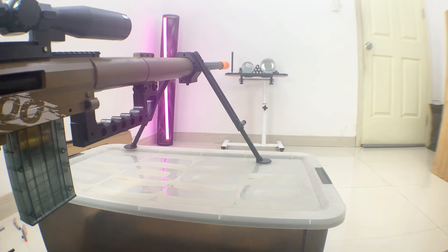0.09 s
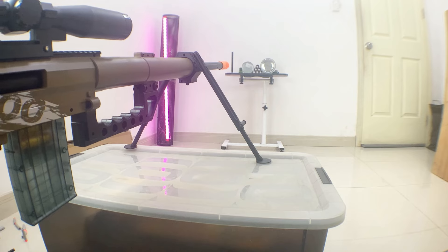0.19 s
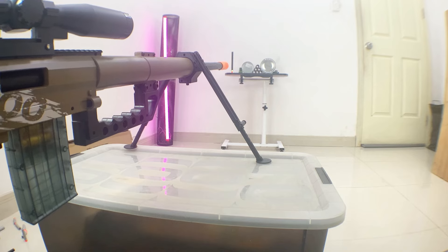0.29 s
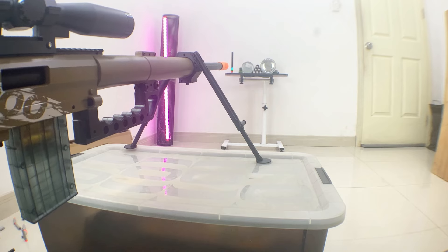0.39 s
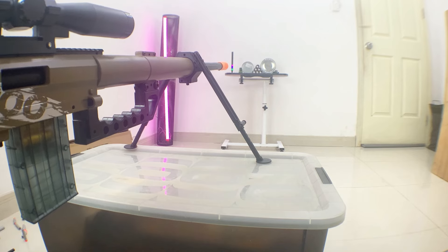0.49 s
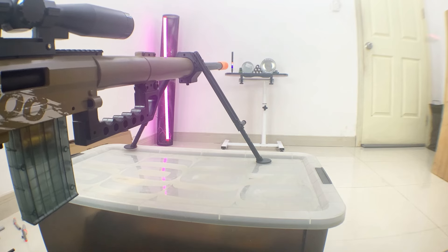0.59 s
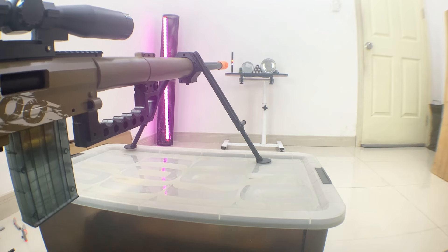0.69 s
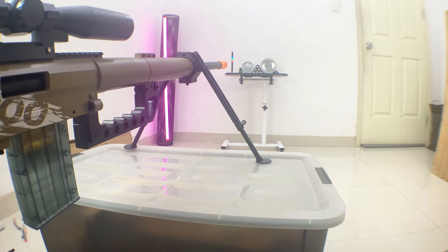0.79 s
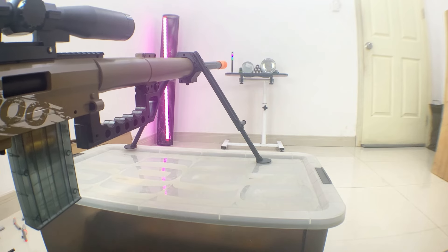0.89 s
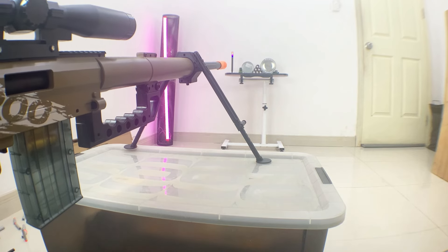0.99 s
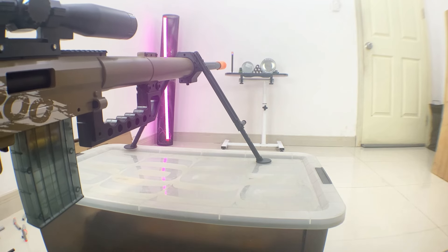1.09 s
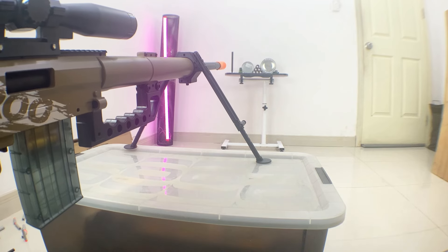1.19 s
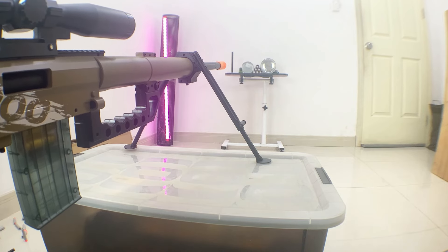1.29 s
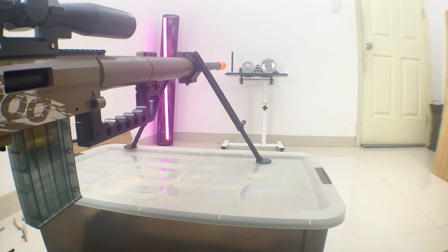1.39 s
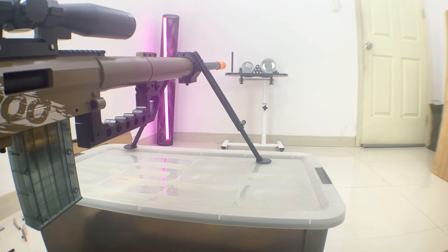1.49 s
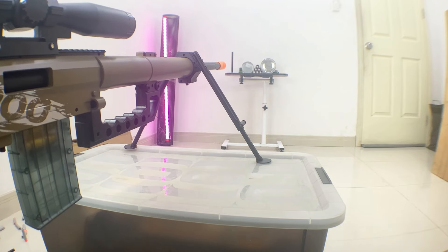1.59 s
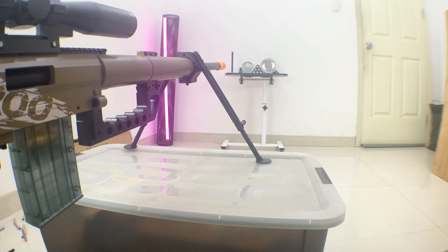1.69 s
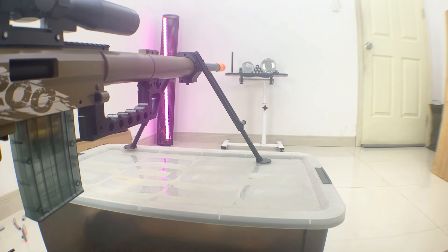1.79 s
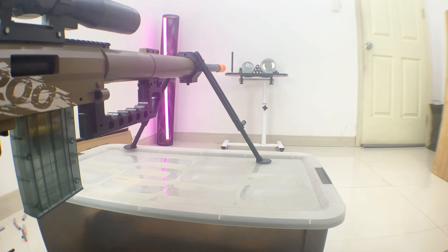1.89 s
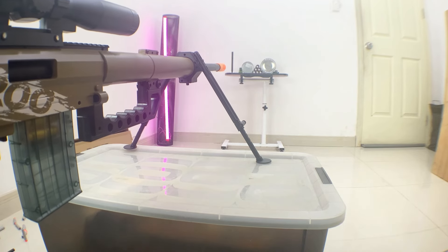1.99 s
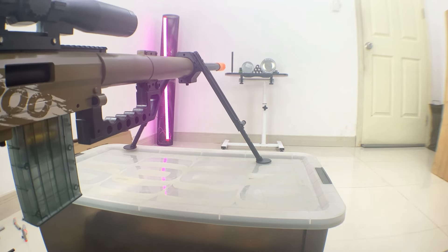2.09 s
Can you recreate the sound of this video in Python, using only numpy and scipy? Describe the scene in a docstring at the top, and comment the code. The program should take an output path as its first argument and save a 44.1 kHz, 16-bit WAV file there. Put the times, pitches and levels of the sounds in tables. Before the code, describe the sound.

One toy rifle shot in a small bare room: plunger slam, louder metal target bang and wavering ring, a small dart click, then quiet ticks and a brief high squeak over low hiss, overloaded close microphone.

```python
"""A spring-driven toy dart rifle fires in a small hard room: trigger tick, plunger release and slam. The dart
bangs into a thin metal target that rings, then it drops, a joint squeaks and small ticks follow.
Blows are short cracks of coloured noise plus the room's answer; metal is a set of wavering tones; the squeak
is a gliding tone with overtones and rasp. The loud part overloads the microphone; rumble and hiss lie below."""
import sys
import numpy as np
from scipy import signal
from scipy.fft import rfft, irfft, next_fast_len
from scipy.io import wavfile
from scipy.ndimage import map_coordinates

SR = 44100
rng = np.random.default_rng(int(sys.argv[2]) if len(sys.argv) > 2 else 0)


def gain_from_decibels(decibels):
    """Convert decibel values to linear amplitude factors."""
    exponent = np.asarray(decibels, float) / 20
    return 10 ** exponent


def to_wav(s):
    """Save 16-bit WAV."""
    ch = np.atleast_2d(s).T  # columns
    pcm = np.round(np.clip(ch, -1, 1) * 32767)  # PCM
    wavfile.write(sys.argv[1], SR, pcm.astype(np.int16))


N = 94815  # length in samples
T = np.arange(N) / SR  # time of each sample in seconds

# How fast the room dies away after near sounds. Each row: frequency in Hz, time to fall by 60 dB in s.
NEAR_ROOM = [(100, 0.38), (500, 0.33), (3000, 0.34), (6000, 0.48), (11000, 0.34), (16000, .15)]
HIT_S, METAL_RISE_S = .312, 0.03  # when the target starts to ring and how slowly its ring rises


def unit(x):
    """Scale to rms 1."""
    return x / np.sqrt(np.mean(x ** 2) + 1e-20)


def along(points, hz):
    """Read a curve of (Hz, value) points on a log frequency axis."""
    f, v = np.transpose(points)
    return np.interp(np.log(hz + 1), np.log(f + 1), v)


def curves(rows):
    """One value per sample for each column after the time."""
    s, *cols = np.transpose(rows)
    return [np.interp(T, s, c) for c in cols]


def wobble(rate):
    """A smooth random curve with rate random points a second, at most 1500."""
    return map_coordinates(rng.standard_normal(4000), [T * min(rate, 1500)])


def noise(response):
    """Noise of rms 1 with a gain that depends on frequency."""
    m = next_fast_len(N)
    spectrum = rfft(rng.standard_normal(m)) * response(np.fft.rfftfreq(m, 1 / SR))
    return unit(irfft(spectrum, m)[:N])


def band(hz, width_hz):
    """Gain of one resonance, strongest at its own pitch."""
    return lambda f: np.abs(f * width_hz / (hz * hz - f * f + 1j * f * width_hz))


def dying(s, t60, rise_s):
    """Envelope that starts at s, rises and then falls by 60 dB in t60 seconds."""
    t = np.clip(T - s, 0, None)
    return (1 - np.exp(-t / rise_s)) * gain_from_decibels(-60 * t / t60)


def tail(x, s, room):
    """Turn steady noise into the room's answer to a blow at s: each frequency dies at its own speed."""
    late_db, late_longer = -26.5, 2.6  # a weaker, slower second slope
    build_s = 0.0014  # rise of the room's answer
    hz, t, z = signal.stft(x, SR, nperseg=256)
    fall_db = -60 * np.clip(t - s, 0, None) / along(room, hz)[:, None]
    z = z * (gain_from_decibels(fall_db) + gain_from_decibels(late_db + fall_db / late_longer))
    answer = signal.istft(z, SR, nperseg=256)[1][:N]
    return answer * dying(s, 1e3, build_s)


def blows(rows, colour, room):
    """Each blow is a short crack and the room's answer, in the colour of the struck thing."""
    gain = lambda f: gain_from_decibels(along(colour, f))
    total = 0
    for s, crack_db, t60, room_db in rows:
        crack = gain_from_decibels(crack_db) * noise(gain) * dying(s, t60, 1e-4)
        answer = gain_from_decibels(room_db) * tail(noise(gain), s, room)
        total = total + crack + answer
    return total


def floor():
    """Background rumble and hiss with a few narrow noise bands, all gently wavering in level."""
    # Colour of the hiss. Each row: frequency in Hz, relative level in dB per Hz.
    hiss_colour = [(4.7, -30.5), (8.0, 2.5), (97, -8.5), (156, -14), (229, -26.5), (325, -18.5),
                   (433, -23.5), (635, -22), (903, -27), (1500, -30.5), (2350, -30.5), (3340, -27.5),
                   (5400, -36), (15000, -50.5), (16500, -62)]
    # Slow course of the hiss. Each row: time in seconds, level in dB about which it wavers.
    hiss_level = [(0, -54.5), (.2, -52), (.46, -60.5), (.7, -51), (.9, -51.5), (1.3, -49), (2.15, -49.5)]
    # Narrow hiss bands. Each row: frequency in Hz, resonance width in Hz, level in dB about which it wavers.
    whines = [(324, 160, -66), (585, 35, -71), (1520, 130, -68), (3320, 160, -65.5), (6820, 390, -77.5),
              (9250, 200, -82), (10710, 160, -77)]
    level_db, = curves(hiss_level)
    total = noise(lambda f: gain_from_decibels(along(hiss_colour, f))) * gain_from_decibels(level_db + .7 * wobble(8))
    for hz, width_hz, db in whines:
        whine = noise(lambda f: band(hz, width_hz)(f) ** 2)
        total = total + gain_from_decibels(db + 1.4 * wobble(13)) * whine
    return total


def ticks():
    """Faint ticks and rustles of settling parts: short bursts of noise around one pitch."""
    # Each row: start in seconds, level in dB, pitch in Hz, time to fall by 60 dB in s.
    tick_rows = [(1.2095, -40.5, 1570, 0.018), (1.19, -48.5, 397, 0.092), (1.211, -47.5, 150, 0.057),
                 (1.3357, -52, 1200, .04), (1.4395, -58.5, 8990, 0.029), (1.5194, -40.5, 3056, 0.013),
                 (1.523, -49, 2050, 0.035), (1.65, -54, 1548, .05), (1.7775, -50, 2000, 0.022),
                 (1.845, -52, 1400, 0.058), (1.862, -51, 4200, 0.032), (2.048, -49, 1540, 0.019),
                 (2.068, -48.5, 4000, 0.047), (2.094, -53, 820, 0.095), (2.116, -42, 1105, 0.037),
                 (2.129, -49, 880, 0.1)]
    total = 0
    for s, db, hz, t60 in tick_rows:
        grain = noise(lambda f: band(hz, .9 * hz)(f) ** 2)
        total = total + gain_from_decibels(db) * grain * dying(s, t60, 0.00048)
    return total


def squeal(rows):
    """A stick-slip squeal: a gliding tone with overtones and rasp; roughness shakes pitch and level."""
    # Each row: multiple of the pitch, level in dB on top of the overtone curve.
    overtones = [(2, 1.5), (3, -5.5), (4, -14)]
    # Colour of the rasp. Each row: frequency in Hz, relative level in dB per Hz.
    rasp_colour = [(1800, -34), (2500, 2), (3400, 12), (4500, 2), (6200, -5), (8000, -18), (12000, -25),
                   (14000, -40)]
    jitter_hz, flutter_db, rasp_db = 91, 4, -7  # each at roughness 1
    hz, db, over_db, rough = curves(rows)
    phase = 2 * np.pi * np.cumsum(hz + rough * jitter_hz * wobble(400)) / SR
    tone = np.sin(phase)
    for k, extra_db in overtones:
        tone = tone + gain_from_decibels(over_db + extra_db) * np.sin(k * phase)
    rasp = rough * gain_from_decibels(rasp_db) * noise(lambda f: gain_from_decibels(along(rasp_colour, f)))
    level = gain_from_decibels(db + rough * flutter_db * wobble(250))
    sounding = (T > rows[0][0]) * (T < rows[-1][0])
    return (np.sqrt(2) * tone + rasp) * level * sounding


def squeak():
    """Two squealing contacts of a joint and their echo in the room."""
    # Each row: time in seconds, pitch in Hz, level in dB, overtones in dB, roughness (0 is smooth, 1 rough).
    low_squeal = [(1.945, 3062, -64.5, -28, 0.06), (1.958, 3076, -43.5, -32, .2),
                  (1.968, 3047, -54, -30, 0.3), (1.978, 2980, -33, -24, 0.3), (1.985, 3185, -46.5, -10, .4),
                  (1.99, 3063, -61, -14.5, 0.96), (2.003, 3012, -47, -15, 1), (2.02, 3100, -55, -11, 1.1),
                  (2.048, 2890, -50.5, -21, 1.04), (2.058, 2953, -66, -21, 1.04)]
    # Each row: time in seconds, pitch in Hz, level in dB, overtones in dB, roughness (0 is smooth, 1 rough).
    high_squeal = [(1.982, 3680, -64, -25, 0.77), (1.987, 3638, -46, -25, 0.86), (2.0, 3613, -49, -23, 1),
                   (2.018, 3590, -53.5, -20, 0.96), (2.027, 3372, -39.5, -19.5, 0.47),
                   (2.036, 3460, -50, -9, 0.5), (2.055, 3440, -54.5, -13, .6),
                   (2.068, 3453, -67, -18.5, 0.96)]
    room_db = -6.5
    direct = squeal(low_squeal) + squeal(high_squeal)
    echo = tail(rng.standard_normal(N), 0, NEAR_ROOM)[:SR // 2]
    echo = echo / np.linalg.norm(echo)
    return direct + gain_from_decibels(room_db) * signal.fftconvolve(direct, echo)[:N]


def drop():
    """The dart clicks on the floor, far off: a few very short tones plus coloured blows."""
    # Dart on the floor. Each row: start in seconds, crack in dB, crack's 60 dB fall in s, room in dB.
    falls = [(.9255, -16.5, 0.0092, -32.5), (.9445, -30, 0.022, -39)]
    # Colour of the blows. Each row: frequency in Hz, relative level in dB per Hz.
    colour = [(180, -55), (300, -30), (800, -16), (1400, -16.5), (1700, 3), (1910, -9.5), (2780, -2),
              (3300, -10), (3700, -19.5), (4690, -8.5), (5440, -18), (7500, -26.5), (9030, -22.5),
              (12000, -31.5), (13500, -50), (16000, -54.5)]
    # The dart's own tones. Each row: frequency in Hz, level in dB, time to fall by 60 dB in s.
    dart_tones = [(1730, -33, 0.017), (2660, -15.5, 0.015), (3100, -24, 0.028), (4830, -31.5, 0.016)]
    # How fast the room dies after this far sound. Each row: frequency in Hz, time to fall by 60 dB in s.
    far_room = [(300, 0.31), (1500, 0.39), (3000, 0.48), (6000, 0.33), (11000, 0.52), (16000, 0.26)]
    s = falls[0][0]
    click = 0
    for hz, db, t60 in dart_tones:
        click = click + gain_from_decibels(db) * dying(s, t60, 0.0005) * np.sin(2 * np.pi * hz * (T - s))
    return click + blows(falls, colour, far_room)


def pings():
    """Brief soft swells of single tones as the target settles."""
    # Each row: start in seconds, frequency in Hz, level in dB, time to fall by 60 dB in s.
    ping_rows = [(.495, 1335, -17, .12), (.605, 1690, -25, .12), (.6, 421, -27, .15),
                 (.706, 1338, -24, .09), (.95, 1700, -35, .14)]
    total = 0
    for s, hz, db, t60 in ping_rows:
        tone = np.sin(2 * np.pi * (hz * T + rng.random()))
        total = total + gain_from_decibels(db) * dying(s, t60, .015) * tone
    return total


def stand():
    """One long clear ring of the target's stand outlasts the bang, its level wavering slowly."""
    # The ring: frequency in Hz, level in dB about which it wavers, time to fall by 60 dB in s.
    linger = (851, -30, 1.62)
    hz, db, t60 = linger
    return gain_from_decibels(db + 1.2 * wobble(5)) * dying(HIT_S, t60, METAL_RISE_S) * np.sin(2 * np.pi * hz * T)


def target():
    """Sheet metal rings at many pitches, each wavering as the room smears it."""
    # Each row: frequency in Hz, relative level in dB, time to fall by 60 dB in s, slow waver in Hz.
    modes = [(307.9, -10, 0.56, 24), (327.3, 1.2, .55, 9), (349, -22.5, 0.86, 18), (389, -2, 0.41, 20.8),
             (423, 1.5, 0.61, 8.3), (588, -6, .5, 25.5), (674, -14.5, 0.27, 20), (775, -1.5, 0.43, 22),
             (985, -8.5, .55, 21.6), (1335, -8.5, 0.78, 25.58), (1550, -12, 0.52, 16),
             (1674.5, -2.5, 0.64, 12.34), (1725, -1.5, .7, 14.94), (2207, -8, 0.61, 23),
             (2740, -17.5, 0.92, 30), (3950, -16, .55, 90), (4143, -1.5, 0.43, 70), (4593, -13, 0.84, 350)]
    # The level of the ring moves up and down in steps. Each row: time in seconds, change in dB.
    ring_level = [(.31, 3), (.4, -2), (.46, 5.5), (.475, -2.5), (.515, 4), (.53, -2), (.6, -1), (.635, 6.5),
                  (.65, -12), (.7, 4), (.725, 5), (.745, 1), (.82, 5), (.9, 8.5)]
    ring_db = -3.5
    steady, slow, fast = .5, .5, .4  # shares of the plain tone and of its two wavers
    ring = 0
    for hz, db, t60, waver_hz in modes:
        fast_hz = 3 * waver_hz
        slow_waver = wobble(waver_hz) + 1j * wobble(waver_hz)
        fast_waver = wobble(fast_hz) + 1j * wobble(fast_hz)
        smear = steady + slow * slow_waver + fast * fast_waver
        tone = np.real(smear * np.exp(2j * np.pi * (hz * T + rng.random())))
        ring = ring + gain_from_decibels(db) * dying(HIT_S, t60, METAL_RISE_S) * tone
    return gain_from_decibels(ring_db + curves(ring_level)[0]) * ring


def bang():
    """The dart hits the target: one loud noisy crack that the room answers."""
    # Each row: start in seconds, crack in dB, crack's 60 dB fall in s, room in dB.
    hit = [(.312, 0.5, .02, 1)]
    # Colour of the hit. Each row: frequency in Hz, relative level in dB per Hz.
    colour = [(120, -79.5), (200, -37.5), (303, -4), (412, -2), (485, -12.5), (761, -6.5), (1170, -19),
              (1310, -3), (1720, -12), (2020, -12.5), (3600, -14.5), (4100, -8.5), (4700, -12),
              (5300, -17.5), (7280, -15.5), (11400, -20.5), (13200, -36.5), (16000, -46)]
    # How fast the room dies after the hit. Each row: frequency in Hz, time to fall by 60 dB in s.
    bang_room = [(100, 0.5), (300, 0.46), (1000, 0.54), (3000, 0.59), (6000, 0.51), (11000, 0.3),
                 (16000, .25)]
    return blows(hit, colour, bang_room)


def rifle():
    """Trigger tick, plunger release and slam: parts knock together and the room answers."""
    # Each row: start in seconds, crack in dB, crack's 60 dB fall in s, room in dB.
    contacts = [(.194, -57, 0.019, -59), (.2055, -42, .02, -41.5), (.2075, -9, 0.045, -12),
                (.215, 6, 0.026, -10)]
    # Colour of the rifle. Each row: frequency in Hz, relative level in dB per Hz.
    colour = [(59, -44.5), (100, -6.5), (249, -7), (308, -0.5), (365, -7), (558, 3.5), (784, -7), (991, -1),
              (1800, -12.5), (1950, -4.5), (2320, -12), (2690, -2.5), (3540, -2.5), (9820, -21),
              (16000, -37)]
    return blows(contacts, colour, NEAR_ROOM)


def scene():
    """All sources except the background, in one channel."""
    shot = rifle() + bang() + target() + stand() + pings()
    return (shot + drop() + ticks() + squeak())[None]


def band_limit(x):
    """A steep low-pass at the top of the band."""
    return signal.sosfilt(signal.butter(12, 16990, fs=SR, output="sos"), x)


def record(dry):
    """The microphone overloads, the level moves, lows and top are cut and background noise is added."""
    # Overall level after the overload. Each row: time in seconds, level in dB.
    level_rows = [(0, -4.5), (.23, -4.5), (.31, -2.5), (.33, -2), (.46, -1), (.48, -2), (.65, -2.5),
                  (.75, -2), (.82, .8), (.9, -.8), (.93, 0), (.982, 1.5), (.992, -2.5), (1.04, -.8),
                  (1.15, 0)]
    clip_top, clip_hard = 0.87, 9.9  # highest amplitude, and how sharply the wave bends toward it
    low_cut_hz, top_hz = 90, 15800
    x = dry / (1 + np.abs(dry / clip_top) ** clip_hard) ** (1 / clip_hard)
    x = x * gain_from_decibels(curves(level_rows)[0])
    x = signal.lfilter(*signal.butter(1, low_cut_hz / (SR / 2), "high"), x)
    x = x + floor()
    x = signal.sosfilt(signal.ellip(10, .5, 60, top_hz / (SR / 2), output="sos"), x)
    return band_limit(x)


dry = scene()
out = record(dry)
to_wav(out)
```